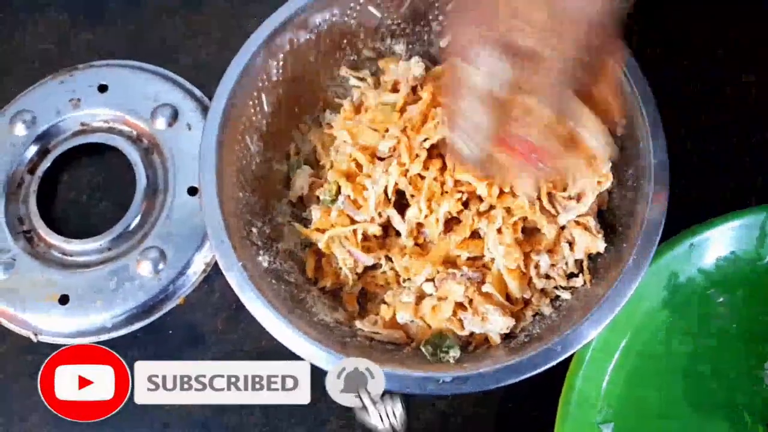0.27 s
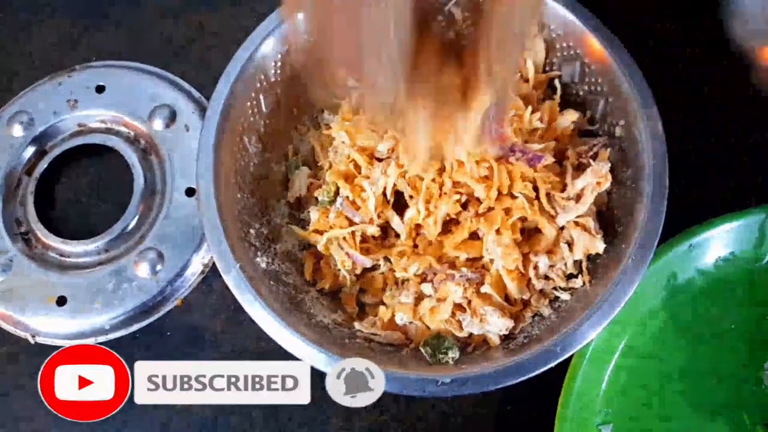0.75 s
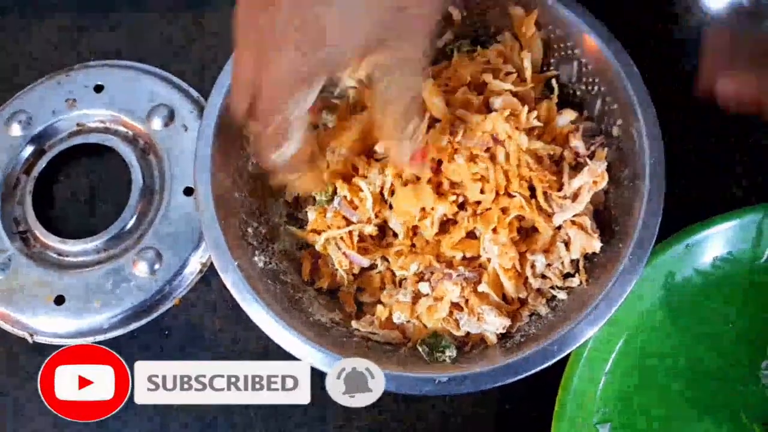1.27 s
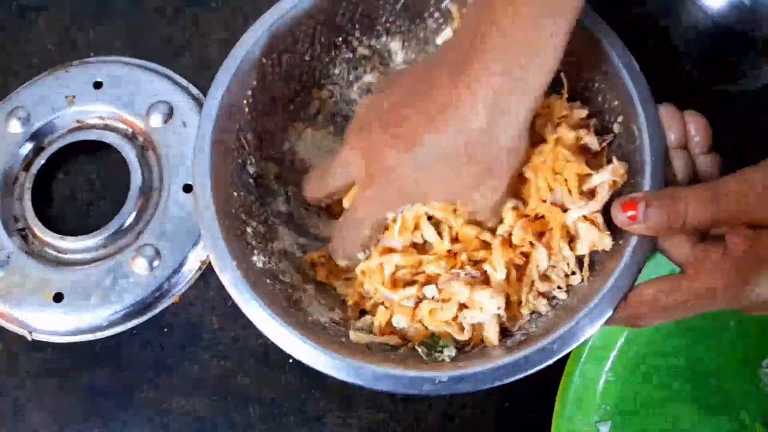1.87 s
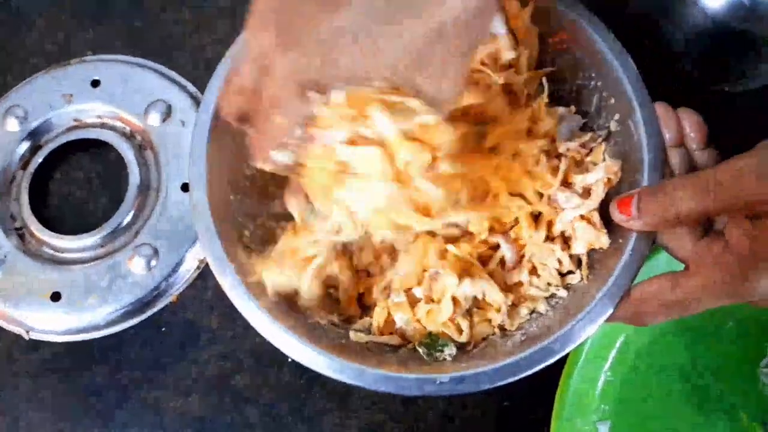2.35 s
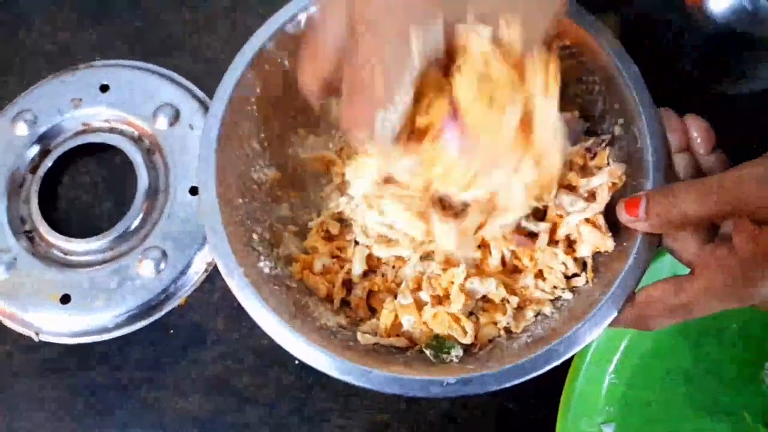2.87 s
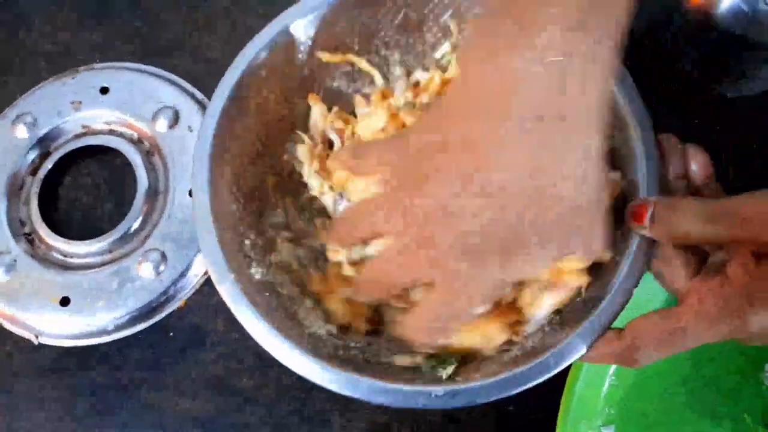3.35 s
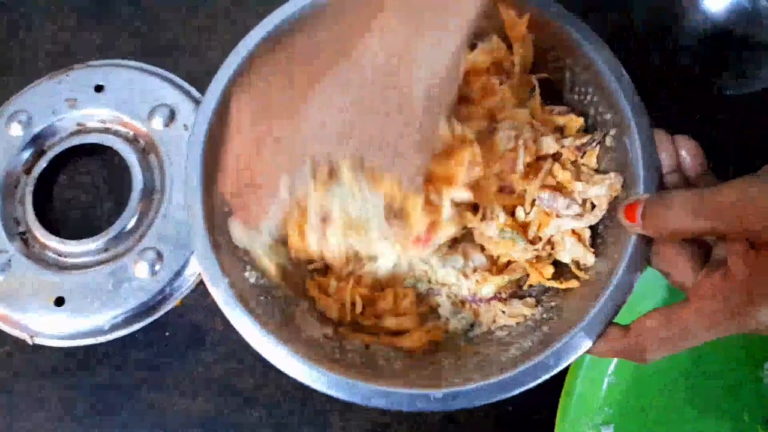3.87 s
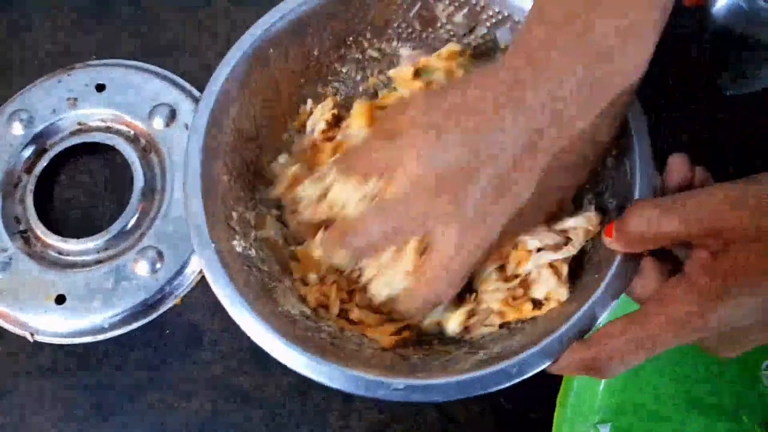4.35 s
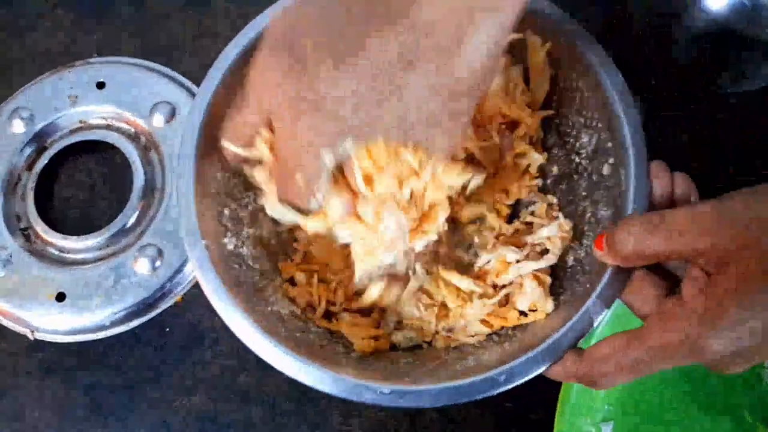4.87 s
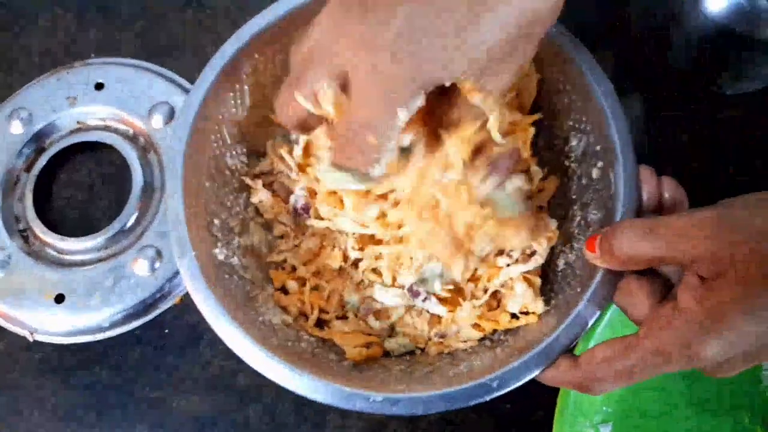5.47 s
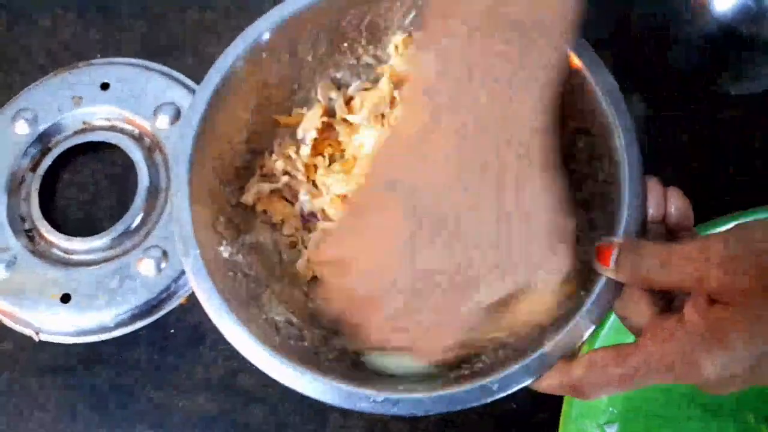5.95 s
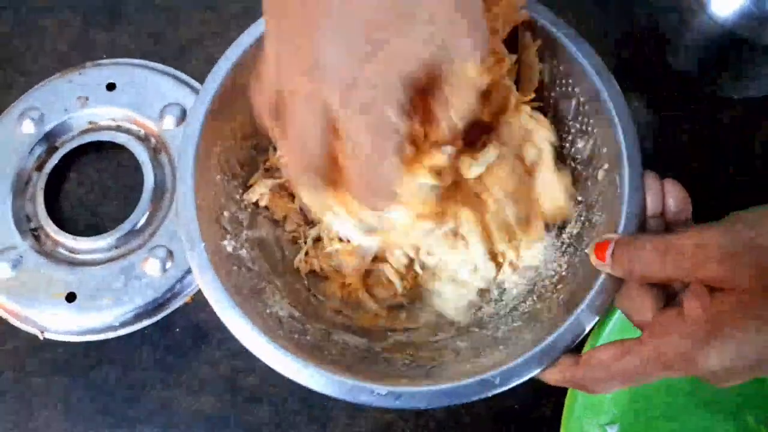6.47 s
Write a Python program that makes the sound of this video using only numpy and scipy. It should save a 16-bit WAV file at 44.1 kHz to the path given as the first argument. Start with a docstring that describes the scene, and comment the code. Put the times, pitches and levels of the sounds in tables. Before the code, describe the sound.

Close stereo sound in a small, lightly reverberant kitchen. For the first second there is only low room rumble, thin hiss, a barely audible rustle and a tiny pop at 0.15. At 0.98 a full steel bowl lands with a loud, round, low thump and rocks, with much weaker bumps until 1.5. Kneading starts near 1.4: crisp, damp shreds rub and crunch in short squeezes, with a snap at 2.0. From 2.2 to 2.9 a handful is lifted, fizzing softly with pops and nail ticks. A longer squeeze comes at 3.3, a bright pop at 3.6, and duller knocks and squeezes around 4.2 to 4.5. Lighter peeling, pops and very faint squeaks fill 4.6 to 5.7. At 5.9 to 6.1 the hardest crunch snaps brittle ribs with sharp metallic taps. It then quiets, until clicks, a pop and a final squeeze around 6.45 to 6.7.

```python
"""Low room rumble, thin hiss and a faint rustle with a tiny pop come first; then a steel bowl thumps on a counter
and rocks. A hand kneads shredded cabbage and flour in it, close to the microphone in a small kitchen.
Filtered random grains make the rubbing, crushing and fizzing; decaying sines and noise bursts make the pops,
knocks and taps; decaying grain runs make the snapping ribs; gliding tones make the squeaks.
Decaying diffuse noise, convolved with every source but the background, makes the room's answer."""
import sys
import numpy as np
from scipy import signal
from scipy.fft import rfft, irfft, next_fast_len
from scipy.io import wavfile
from scipy.ndimage import uniform_filter1d, map_coordinates

SR = 44100
rng = np.random.default_rng(int(sys.argv[2]) if len(sys.argv) > 2 else 0)


def put_to_file(sound):
    """Save the sound as 16-bit audio at rate SR, in the file named by the first command-line argument."""
    columns = np.atleast_2d(sound).T  # one column per channel
    safe = np.clip(columns, -1, 1)
    whole_steps = np.round(safe * 32767)
    wavfile.write(sys.argv[1], SR, whole_steps.astype(np.int16))


N = 295514

LAG = 0.00012  # lead of the left, nearer microphone port [s]
REBOUND_S = 0.03  # the rocking bowl meets the counter again after this time

# The bowl lands and rocks on the counter: (time [s], level [dB], damping by the hand [dB/s],
# loss per rebound [dB], crack over the knock [dB], upper edge of the crack [Hz], t60 of the crack [s])
KNOCKS = [(0.982, 0.5, 9, 16.5, -21, 13900, 0.13), (1.121, -18.5, 0, 5, -44, 1000, .03),
          (1.222, -26.5, 10, 4.5, -40, 1001, 0.033), (1.397, -26, 42, 15, -36, 3000, .06),
          (1.474, -25, 22, 4, -40, 3000, .08), (3.2386, -25, 42, 6, -6, 2210, 0.012),
          (4.2336, -26, 198, 19, 8, 1510, 0.013), (4.8434, -33.5, 30, 17, -6, 1500, .04),
          (5.757, -48, 600, 25, 10.5, 2500, 0.017), (5.8028, -30.5, 300, 14, 0, 1600, 0.02),
          (6.459, -33.5, 596, 27, 4, 900, 0.018), (6.4748, -31.5, 500, 31, 5.5, 1010, 0.013),
          (6.5803, -43.5, 500, 30, 8, 2620, 0.014)]
# Colour of breaking ribs: (frequency [Hz], relative level [dB])
RIB = [(200, -34), (600, 4.5), (1300, -1), (1750, -7.5), (2250, -5), (2800, -9), (3400, 1.5), (4350, 6.5),
       (4750, -6.5), (5600, -1.5), (6600, -12.5), (9000, -27), (16000, -29)]
# A handful is lifted and wet shreds peel apart: (time [s], length [s], fizz level at the height [dB])
LIFTS = [(2.255, 0.68, -57), (4.659, 0.65, -57.5), (5.247, 0.31, -60.5), (6.29, 0.23, -64)]


def amp(db):
    """Level is logarithmic: decibels to amplitude gain."""
    return 10 ** (np.asarray(db) / 20)


def unit(x):
    """Normalisation by signal power: scaled to rms 1."""
    return x / np.sqrt(np.mean(x ** 2) + 1e-20)


def along(points, hz):
    """Pitch is logarithmic: (frequency [Hz], value) points read on a log axis."""
    f, v = np.transpose(points)
    return np.interp(np.log(hz + 1), np.log(f + 1), v)


def curves(rows):
    """Linear interpolation in time: one value per sample for each column after the time."""
    s, *cols = np.transpose(rows)
    return [np.interp(np.arange(N) / SR, s, c) for c in cols]


def wobble(rate):
    """Slow random modulation: a smooth curve through rate random knots a second."""
    knots = rng.standard_normal(int(N * rate / SR) + 4)
    return map_coordinates(knots, [np.arange(N) * rate / SR])


def filtered(x, response):
    """Linear filtering: the spectrum of x times a response of frequency."""
    n = x.shape[-1]
    m = next_fast_len(n + SR // 2)
    return irfft(rfft(x, m) * response(np.fft.rfftfreq(m, 1 / SR)), m)[..., :n]


def coloured(x, spectrum, size=2048):
    """Minimum-phase filtering: a causal response keeps each grain's sharp front."""
    cepstrum = irfft(np.log(amp(along(spectrum, np.fft.rfftfreq(size, 1 / SR)))))
    # Folding the cepstrum onto positive time makes the filter causal.
    cepstrum[1:size // 2] *= 2
    cepstrum[size // 2 + 1:] = 0
    impulse = irfft(np.exp(rfft(cepstrum)))
    return signal.fftconvolve(x, impulse)[:N]


def diffuse(count):
    """Diffuse-field coherence: stereo noise, alike in the bass and unrelated in the treble."""
    # (frequency [Hz], left-right correlation [-1 to 1])
    likeness = [(25, 0), (90, 0.96), (250, 0.87), (500, 0.4), (1000, 0.19), (3000, 0)]

    def mid_side(hz):
        turn = np.arccos(np.clip(along(likeness, hz), -1, 1)) / 2
        return np.array([np.cos(turn), np.sin(turn)])

    mid, side = filtered(rng.standard_normal((2, count)), mid_side)
    return np.array([mid + side, mid - side])


def add(track, s, sound):
    """Superposition: mix a sound into the track at time s."""
    part = track[..., round(s * SR):][..., :sound.shape[-1]]
    part += sound[..., :part.shape[-1]]


def sides(pan_db):
    """Level difference between ports: left and right gains, the left pan_db over the right."""
    return amp(pan_db * np.array([[.5], [-.5]]))


def delayed(x, lag):
    """Arrival-time difference: a mono sound at both ports, the left one lag seconds ahead."""
    return filtered(x, lambda hz: np.exp(1j * np.pi * hz * lag * np.array([[1], [-1]])))


def background():
    """Steady broadband noise: low room rumble and a thin, resonant hiss, slightly unsteady."""
    # (time [s], rumble level [dB], hiss level [dB])
    levels = [(0, -45, -56), (0.95, -44.5, -56.5), (1.3, -46.5, -61.5), (2.2, -52.5, -59.5),
              (4, -49.5, -60.5), (5.6, -53, -61.5), (6.7, -52, -60)]
    # Colours of the two noises: (frequency [Hz], relative level [dB])
    rumble_colour = [(15, -58), (25, -20), (60, 0), (90, -2), (150, 4), (210, -2.5), (260, -9), (320, -3.5),
                     (490, -8.5), (660, -10), (850, -19), (1400, -30.5), (4000, -69)]
    hiss_colour = [(400, 6.5), (1200, -1), (2000, 4.5), (3400, 5), (6400, -3), (7500, -11.5), (10000, -11),
                   (14000, -10), (16000, -14)]
    # Narrow resonances in the hiss: (centre [Hz], half-width [Hz], height [dB])
    hiss_peaks = [(2830, 27, 3.5), (5040, 90, 2.5), (6470, 110, 5)]

    def hiss_gain(hz):
        peaks_db = sum(db / (1 + ((hz - centre) / width) ** 2) for centre, width, db in hiss_peaks)
        return amp(along(hiss_colour, hz) + peaks_db)

    rumble_db, hiss_db = curves(levels)
    rumble = unit(filtered(diffuse(N), lambda hz: amp(along(rumble_colour, hz))))
    hiss = unit(filtered(diffuse(N), hiss_gain))
    return amp(rumble_db + 0.081 * wobble(8.0)) * rumble + amp(hiss_db) * hiss


def hand():
    """Incoherent addition: stirring, squeezes and lifts add in power; gives rub, shred and fizz levels in dB."""
    # The hand keeps turning the heap between squeezes: (time [s], force as shred level [dB])
    stirring = [(1.375, -55.5), (1.8, -58.5), (2.2, -58), (2.6, -55.5), (3.17, -59.5), (3.7, -55.5),
                (4.45, -54.5), (4.72, -58.5), (5.0, -60), (5.25, -63), (5.65, -63.5), (5.85, -69),
                (6.35, -68), (6.7, -68)]
    # The hand closes on the shreds: (time [s], hold [s], force as it lets go [dB],
    # rubbing on the bowl over the force [dB], wetness over the force [dB])
    squeezes = [(1.376, 0.035, -49.5, 10, 0), (1.44, 0.077, -58.5, 11.5, -4), (1.511, 0.022, -43.5, 7, -11),
                (1.6, 0.092, -55.5, 9, -1.5), (2.002, 0.0098, -46.5, -13, -5), (2.42, 0.038, -53, 4, -12),
                (2.99, 0.024, -50, 7, -7), (3.314, 0.24, -43.5, 6.5, -3), (4.126, 0.018, -55.5, 11.5, 0.5),
                (4.246, 0.098, -49.5, 5, -1.5), (4.464, 0.034, -48, 5, -2.5), (5.898, 0.14, -42, 6, 0.5),
                (6.011, 0.017, -36.5, -4, -5), (6.077, 0.024, -42.5, 3, -4), (6.116, 0.021, -45.5, -5, -1),
                (6.535, 0.14, -49, 4, -5.5)]
    stir_rub_db, stir_rub_grows = -18.5, 0.5  # rubbing at a force of 0 dB; its dB per dB of force
    stir_wet_db = -9  # fizz over the force
    grip, build, release = 146, 15, 208  # dB/s: the fingers close, press ever harder, let go
    idle_db = -65.5  # faint rustle before the hand digs in

    t = np.arange(N) / SR
    stir_db, = curves(stirring)
    power = amp([stir_rub_db + stir_rub_grows * stir_db, stir_db, stir_db + stir_wet_db]) ** 2
    for s, hold, force_db, rub_db, wet_db in squeezes:
        below_db = grip * np.maximum(s - t, 0)
        below_db += build * np.clip(s + hold - t, 0, hold)
        below_db += release * np.maximum(t - s - hold, 0)
        power += np.outer(amp([rub_db, 0, wet_db]), amp(force_db - below_db)) ** 2
    for s, length, db in LIFTS:
        power[2] += amp(db) ** 2 * np.sin(np.pi * np.clip((t - s) / length, 0, 1))
    return np.where(t < stirring[0][0], idle_db, 10 * np.log10(power))


def grains(rate, spread_db, smooth):
    """Shot noise: random tiny impulses of unequal size, on a share of smooth sliding noise."""
    sizes = amp(spread_db * np.clip(rng.standard_normal(N), -2, 2)) * rng.choice([-1, 1], N)
    ticks = unit(sizes * (rng.random(N) < rate / SR))
    smooth = np.clip(smooth, 0, 1)
    return np.sqrt(1 - smooth) * ticks + np.sqrt(smooth) * rng.standard_normal(N)


def patchy(x, depth_db):
    """Time-varying filtering: the colour drifts as the hand opens and covers parts of the bowl."""
    z = signal.stft(x, nperseg=512)[2]
    field = rng.standard_normal(z.shape[1:])
    field = uniform_filter1d(field, 11, 0)  # across frequency
    field = uniform_filter1d(field, 9, 1)  # across time
    return signal.istft(z * amp(depth_db * unit(field)), nperseg=512)[1][:, :N]


def crunch(spectrum, rate, spread_db, smooth, alike, patchy_db):
    """Partial coherence: part of the grains reaches both ports directly, part is scattered by the bowl."""
    direct, left, right = [unit(coloured(grains(rate, spread_db, smooth), spectrum)) for _ in range(3)]
    alike = np.clip(alike, 0, 1)
    scattered = np.array([left, right])
    return unit(patchy(np.sqrt(alike) * delayed(direct, LAG) + np.sqrt(1 - alike) * scattered, patchy_db))


def kneading():
    """Friction and fracture: slipping shreds tick; firm squeezes merge into a crunch, the hardest break ribs."""
    # Colours of rubbing, crushed shreds, wet fizz and single tears: (frequency [Hz], relative level [dB])
    rub_colour = [(20, -84), (45, -6.5), (68, -5.5), (88, 4.5), (118, -4), (170, -2), (220, -1.5),
                  (260, -6.5), (310, -5), (480, -15.5), (580, -12), (900, -19.5), (1500, -49), (4000, -71)]
    shred_colour = [(300, -34), (800, -5.5), (1240, 2), (1600, -0.5), (2150, 1.5), (2800, -3), (4300, -4),
                    (5000, -6.5), (6100, -6.5), (7500, -13.5), (12000, -18)]
    fizz_colour = [(2000, -25), (5500, -3), (7500, -4.5), (10000, -6.5), (13000, -4), (16000, -13)]
    tick_colour = [(500, -19), (1700, 12), (2300, 1.5), (3000, -4), (4300, -2), (6500, -5), (9000, -7),
                   (13000, -2), (16000, -18)]
    tick_db = -17.5  # single tears over the shreds

    rub_db, shred_db, fizz_db = hand()
    firmness = 1 / (1 + amp(-52.0 - shred_db))
    breaking = 1 / (1 + amp(-38.5 - shred_db) ** 2)
    clumps_db = 1.13 * wobble(70)
    rub = crunch(rub_colour, rate=500, spread_db=0.5, smooth=0.34, alike=0.88, patchy_db=2.0)
    leaves = crunch(shred_colour, rate=500, spread_db=5.0, smooth=0.41 + 0.47 * firmness,
                    alike=0.15, patchy_db=2.0)
    ribs = crunch(RIB, rate=400, spread_db=6.0, smooth=0.18, alike=0.5, patchy_db=-0.5)
    shreds = np.sqrt(1 - breaking) * leaves + np.sqrt(breaking) * ribs
    fizz = crunch(fizz_colour, rate=470, spread_db=5.0, smooth=0.34 + 0.5 * firmness,
                  alike=0.039, patchy_db=2.5)
    ticks = crunch(tick_colour, rate=70, spread_db=3.5, smooth=0, alike=0.7, patchy_db=3.5)
    crushed = amp(shred_db) * (shreds + amp(tick_db) * ticks)
    return amp(clumps_db) * (amp(rub_db) * rub + crushed + amp(fizz_db) * fizz)


def small_pops(count):
    """Random cavity opening: count tiny pockets in each lifted handful, as rows for pops()."""
    over_fizz_db, centre_hz, spread_octaves, splash = 12.5, 7500, 0.34, 0.97
    rows = []
    for s, length, fizz_db in LIFTS:
        pitches = np.clip(rng.standard_normal(count), -2, 2)
        for when, pitch in zip(rng.random(count), pitches):
            hz = centre_hz * 2 ** (spread_octaves * pitch)
            rows.append((s + when * length, fizz_db + over_fizz_db, hz, splash, 0))
    return rows


def pops():
    """Cavity resonance: each air pocket rings briefly at its own pitch, with a splash of noise around it."""
    # The larger pockets: (time [s], level [dB], pitch [Hz], share of splash [0-1], left over right [dB])
    pockets = [(0.154, -44, 8000, .95, 0), (2.1988, -43, 3130, 0, 0), (2.364, -40, 6960, 0.85, -6),
               (2.538, -38, 10000, 1, -2), (2.578, -34, 8550, 1, 2), (2.663, -36, 7000, 0.6, 0),
               (2.8859, -27.5, 7700, 0.73, 2), (3.1428, -37, 7300, 0.8, 0), (3.367, -26, 4500, 0.3, 0),
               (3.576, -22, 5730, 0.58, 2), (3.839, -35, 9500, 0.8, 4), (3.9694, -28, 2160, 0, 8),
               (4.034, -40.5, 8000, 1, 7), (4.58, -28.5, 11740, 0.33, -7), (4.773, -34, 6000, 0.16, -2),
               (4.8433, -32, 5840, 0.8, 3), (4.9146, -45, 4800, 0.5, 3), (4.965, -32.5, 4500, 0.46, -4),
               (5.012, -33, 11100, 0.7, -6), (5.3027, -38.5, 4400, 0.3, 7.5), (6.431, -38, 10700, 0.5, 5),
               (6.5232, -28, 4300, 0.75, 1), (6.665, -34, 6400, 0.5, 5)]
    decay_cycles = 30.5  # cycles of the pitch in which a pocket falls by 60 dB

    out, t = np.zeros((2, N)), np.arange(SR // 10) / SR
    for s, db, hz, splash, pan_db in pockets + small_pops(count=4):
        t60, splash = decay_cycles / hz, np.clip(splash, 0, 1)
        ring = np.sin(2 * np.pi * hz * t) * (1 - np.exp(-t * hz))
        spray = unit(filtered(rng.standard_normal(len(t)),
                              lambda f: f * hz / (f * f + hz * hz) / np.sqrt(1 + f / hz)))
        burst = 2 * (1 - splash) * ring + splash * spray
        add(out, s, sides(pan_db) * amp(db - 60 * t / t60) * burst)
    return delayed(out, LAG)


def knocks():
    """Modal synthesis: the full bowl thuds and rebounds; modes of alternating sign blend into a round thump."""
    # The loaded bowl on the counter: (mode frequency [Hz], relative level [dB], t60 [s])
    modes = [(109, -12, 0.18), (219.2, -6.5, 0.34), (217, -16, 0.69), (236.9, -9.5, 0.17),
             (276.8, -13.5, 0.26), (299, 0, 0.046), (299.8, -9.5, 0.31), (314.3, -26.5, 0.28),
             (453, -37, 0.55), (523, -31, 0.61), (555, -34, 0.46), (614, -43, 0.59), (670, -9, 0.013),
             (755, -28, 0.043), (953, -45, 0.37), (1177, -25.5, 0.048), (1405, -56, .4), (2051, -43, 0.46),
             (2240, -49, .35), (2794, -53, 0.36), (4237, -46, 0.51), (6470, -58, .5)]
    contact_s = 0.00066  # the blow builds up

    out, t = np.zeros(N), np.arange(SR * 3 // 4) / SR
    ring = np.zeros(len(t))
    for k, (hz, level, t60) in enumerate(modes):
        ring += (-1) ** k * amp(level - 60 * t / t60) * np.sin(2 * np.pi * hz * t)
    for s, db, damping, loss_db, *_ in KNOCKS:
        for k in range(3):
            blow = amp(db - k * loss_db - damping * t) * ring * (1 - np.exp(-t / contact_s))
            add(out, s + k * REBOUND_S, blow)
    # So small a body hardly radiates deep bass.
    radiation = signal.butter(2, 75, "highpass", fs=SR, output="sos")
    return delayed(signal.sosfilt(radiation, out), LAG)


def cracks():
    """Impact noise: each contact of the bowl adds a short crack, duller when dough cushions it."""
    # (frequency [Hz], relative level [dB])
    crack_colour = [(40, -22), (150, -3), (450, 10), (650, 13), (850, 8), (1250, -0.5), (1600, -3.5),
                    (2300, 1.5), (4200, -3), (8000, -13.5), (16000, -15)]
    out, t = np.zeros(N), np.arange(SR // 4) / SR
    for s, db, _, loss_db, crack_db, edge_hz, t60 in KNOCKS:
        for k in range(3):
            grit = filtered(rng.standard_normal(len(t)), lambda hz: 1 / np.sqrt(1 + (hz / edge_hz) ** 4))
            add(out, s + k * REBOUND_S, amp(db + crack_db - k * loss_db - 60 * t / t60) * grit)
    return delayed(coloured(out, crack_colour), LAG)


def snaps():
    """Brittle fracture: a rib cracks sharply, then a fading run of smaller cracks sounds in the bowl's hollow."""
    # Crisp ribs break, fibre after fibre: (time [s], starting level [dB], t60 [s], brightness [dB/octave])
    breaks = [(1.3767, -43, 0.038, -3), (2.4605, -33.5, 0.01, -2.5), (2.972, -38.5, 0.036, 1.5),
              (3.576, -33.5, 0.016, -1.5), (5.915, -28, 0.055, 4), (5.9421, -23, 0.054, 1),
              (6.0044, -30.5, 0.019, 8), (6.011, -27, 0.046, 2), (6.581, -34.5, 0.022, -3)]
    first_crack = 5.5  # amplitude of the first crack, over a run of rms 1 before its decay

    out, t = np.zeros(N), np.arange(SR // 5) / SR
    for s, db, t60, tilt_db in breaks:
        run = unit(rng.standard_normal(len(t)) * (rng.random(len(t)) < 4000 / SR))  # 4000 fibres a second
        fibres = run + first_crack * (t == 0)
        colour = [(hz, level + tilt_db * np.log2(hz / 2000)) for hz, level in RIB]
        strength = np.linalg.norm(coloured(np.ones(1), colour))
        add(out, s, coloured(fibres * amp(db - 60 * t / t60), colour) / strength)
    return delayed(out, LAG)


def clinks():
    """Selective modal excitation: where a fingernail taps the bowl's wall decides which damped modes ring."""
    # A fingernail taps the steel: (time [s], level [dB], centre of the modes it excites [Hz])
    taps = [(2.4295, -35, 2300), (2.4603, -31.5, 2700), (2.9722, -29, 5200), (2.981, -34, 5300),
            (5.914, -24, 4100), (5.9418, -18.5, 4100), (6.459, -33, 3000), (6.4743, -23, 3300),
            (6.5807, -34, 2800)]
    # The bowl's wall: (mode frequency [Hz], relative level [dB], t60 [s])
    wall_modes = [(2090, -18, 0.045), (2270, -3.5, 0.034), (3400, 0, 0.012), (4060, -11, 0.015),
                  (4300, -5, 0.02), (4950, -8.5, .055), (5520, -12, 0.034), (6160, -13, .03),
                  (8300, -9, .015)]
    spread_octaves = 0.4  # spread of the modes a tap excites
    click_db, click_t60 = -2, 0.005  # contact click: level relative to the tap, t60 in s

    out, t = np.zeros(N), np.arange(SR // 5) / SR
    for s, db, centre_hz in taps:
        ring = np.zeros(len(t))
        for hz, level, t60 in wall_modes:
            excitation = 1 / (1 + (np.log2(hz / centre_hz) / spread_octaves) ** 2)
            ring += excitation * amp(level - 60 * t / t60) * np.sin(2 * np.pi * hz * t)
        click = unit(filtered(rng.standard_normal(len(t)), lambda hz: 1 / (1 + (hz / centre_hz) ** 2)))
        onset = 1 - np.exp(-t / 0.00087)
        add(out, s, amp(db) * (ring * onset + click * amp(click_db - 60 * t / click_t60)))
    return delayed(out, LAG)


def squeaks():
    """Stick-slip friction: skin on wet steel gives a wavering tone that glides with the finger's speed."""
    # Wet fingertips on the steel: (time [s], length [s], start pitch [Hz], end pitch [Hz],
    # level before the swell [dB], share of roughness [0-1])
    glides = [(4.3, .075, 1260, 1168, -49.5, .03), (4.39, 0.081, 1190, 1253, -53, .5),
              (4.485, 0.05, 1390, 1530, -65, .3), (4.88, 0.086, 2030, 1905, -60, .5),
              (4.94, .11, 2270, 2080, -60.5, 0.64), (5.049, 0.065, 1936, 2086, -59, .5),
              (5.05, 0.073, 2530, 2900, -62, .5), (5.325, .07, 2980, 2650, -64, .4),
              (5.36, .12, 2790, 2900, -66, .4), (5.635, 0.097, 1890, 2000, -62, 0.85),
              (5.68, 0.13, 2920, 2810, -64, .55), (6.002, 0.036, 5900, 6540, -38.5, 0.98)]
    arch, waver_share = 0.072, 0.0084  # shares of the pitch: mid-glide rise as the finger presses, waver

    out = np.zeros(N)
    for s, length, start_hz, end_hz, db, rough in glides:
        u, rough = np.linspace(0, 1, int(length * SR)), np.clip(rough, 0, 1)
        width_hz = 0.04 * start_hz
        noise = rng.standard_normal((3, SR // 4))
        a, b, waver = filtered(noise, lambda hz: 1 / (1 + (hz / width_hz) ** 2))[:, :len(u)]
        bend = 1 + arch * (np.sin(np.pi * u) - 2 / np.pi) + waver_share * unit(waver)
        phase = 2 * np.pi * np.cumsum((start_hz + (end_hz - start_hz) * u) * bend) / SR
        pure = unit(np.sin(phase))
        narrow_noise = unit(a * np.cos(phase) + b * np.sin(phase))
        tone = np.sqrt(1 - rough) * pure + np.sqrt(rough) * narrow_noise
        add(out, s, amp(db) * np.sin(np.pi * u) * tone)
    return delayed(out, LAG)


def kitchen(x, early_db, tail_db):
    """Reverberation: bowl walls and counter reflect the sound early, then the room rings on."""
    # (frequency [Hz], t60 [s])
    decay_times = [(100, 1), (250, 0.47), (600, 0.91), (2000, 0.77), (5000, 0.64), (14000, 0.5)]
    hz, t, z = signal.stft(diffuse(SR * 3 // 4), SR, nperseg=512)
    decay = amp(-60 * t / along(decay_times, hz)[:, None]) * (1 - np.exp(-t / 0.001))
    tail = signal.istft(z * decay, SR, nperseg=512)[1]
    t = np.arange(tail.shape[1]) / SR
    early = diffuse(len(t)) * amp(-60 * t / 0.042) * (t > 0.002)
    walls = amp(early_db) * early / np.linalg.norm(early[0]) + amp(tail_db) * tail / np.linalg.norm(tail[0])
    return x + signal.fftconvolve(x, walls, axes=1)[:, :N]


def scene():
    """Superposition of hand, bowl and room, each source with its own reverberant share."""
    return (background()
            + kitchen(kneading(), early_db=-10.0, tail_db=-12.5)
            + kitchen(pops(), early_db=-6.5, tail_db=-12)
            + kitchen(knocks(), early_db=-17, tail_db=-8.0)
            + kitchen(cracks(), early_db=-7.5, tail_db=-5)
            + kitchen(snaps() + clinks(), early_db=-6.5, tail_db=-11)
            + kitchen(squeaks(), early_db=-4, tail_db=-6.5))


def record(dry):
    """Transduction: two ports of unequal colour, clipping at full scale, then a sharp band limit."""
    # (frequency [Hz], left over right [dB])
    port_colour = [(60, -2), (110, -1.5), (220, -0.5), (340, -5.5), (500, 1.5), (750, 1), (1250, -1.5),
                   (2500, -1), (4200, -.5), (6800, -4.5), (10000, 0.5), (15000, 2)]
    top_hz = 16100
    ports = filtered(dry, lambda hz: sides(along(port_colour, hz)))
    return filtered(np.clip(ports, -1, 1), lambda hz: hz < top_hz)


dry = scene()
out = record(dry)
put_to_file(out)
```